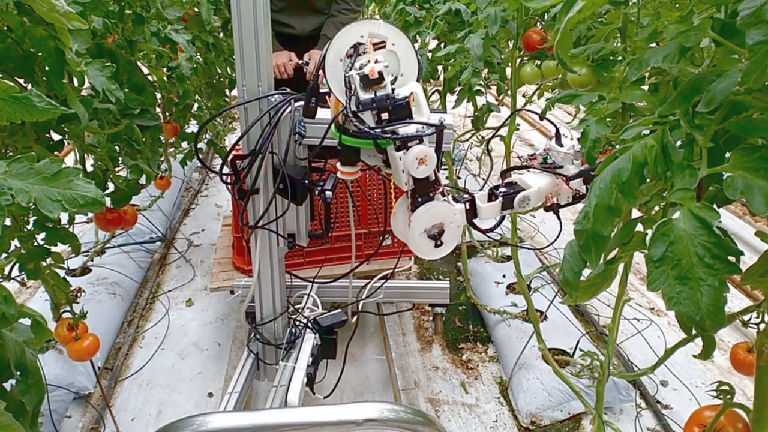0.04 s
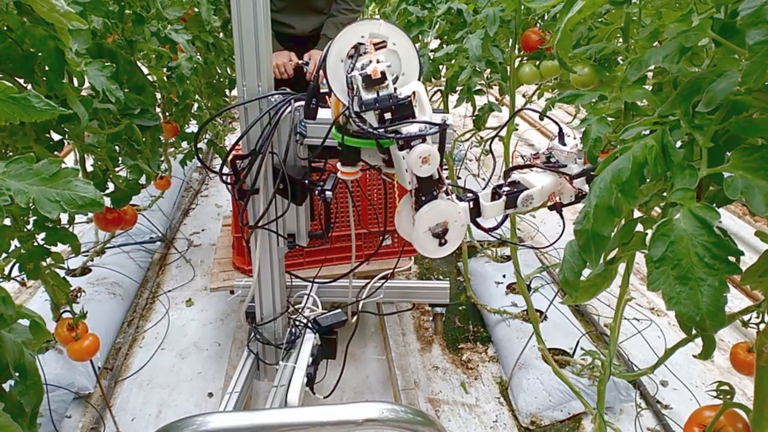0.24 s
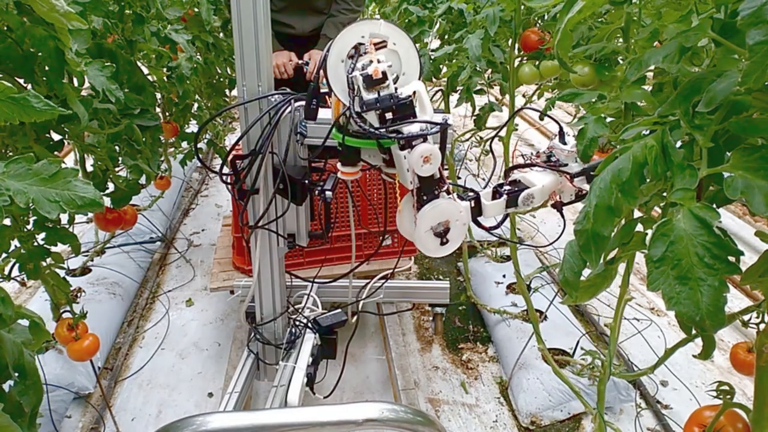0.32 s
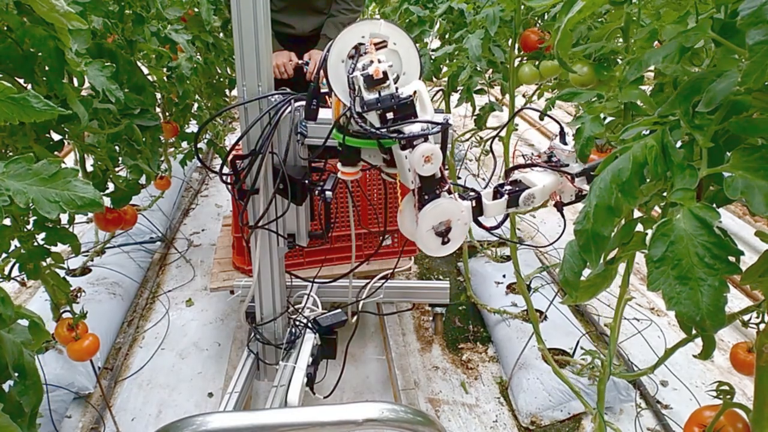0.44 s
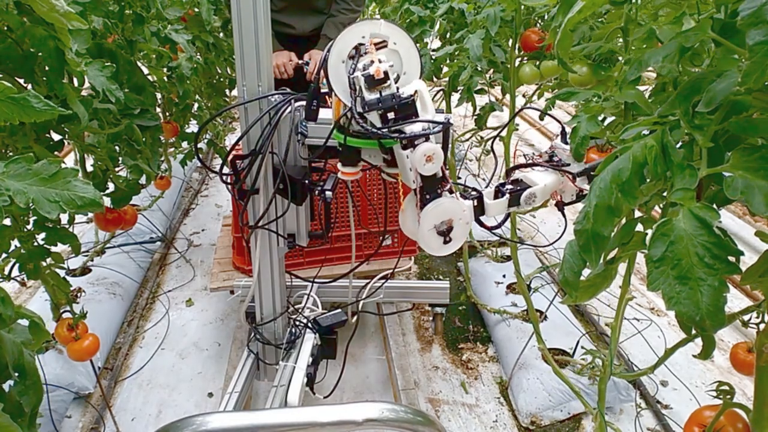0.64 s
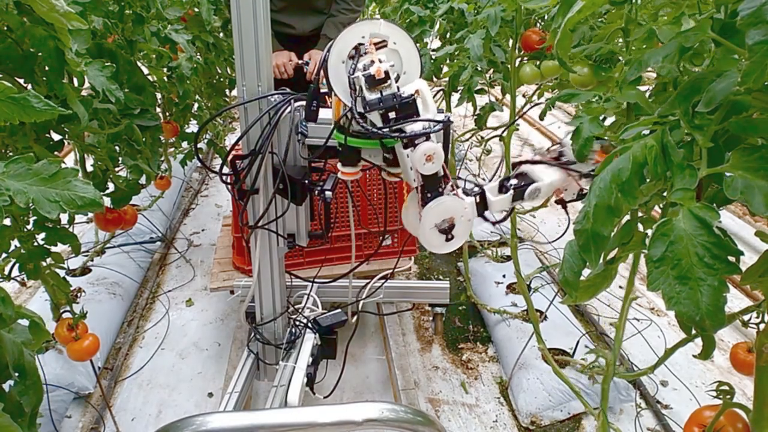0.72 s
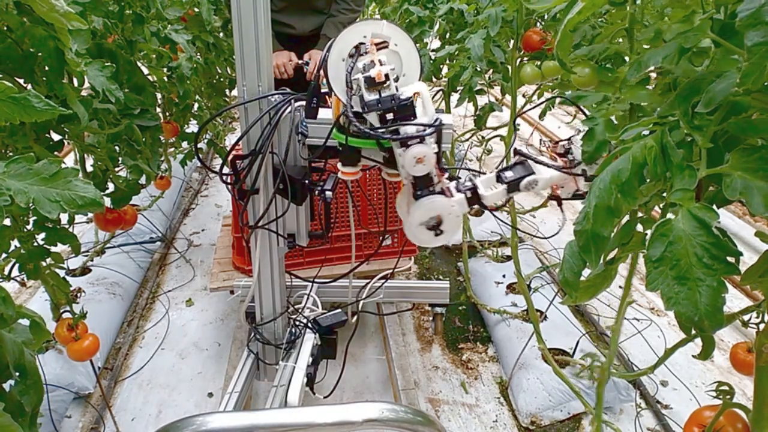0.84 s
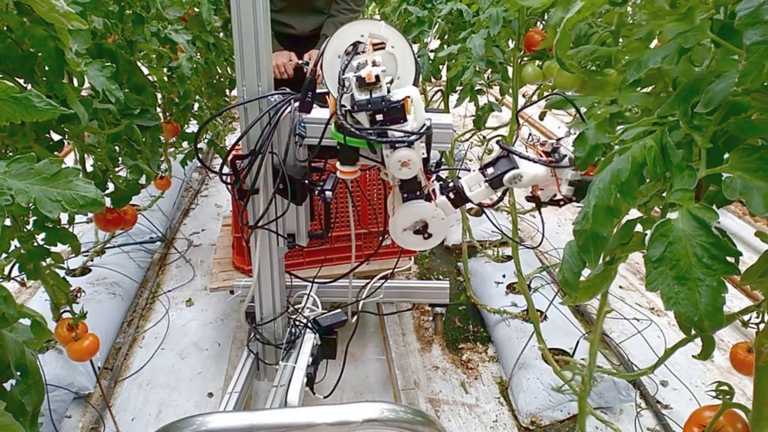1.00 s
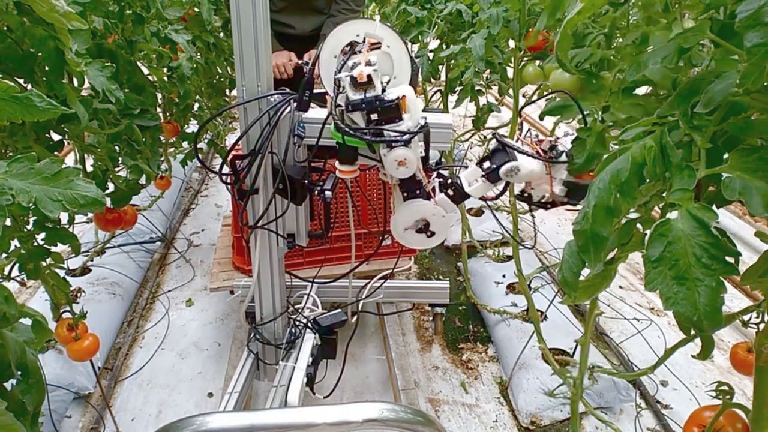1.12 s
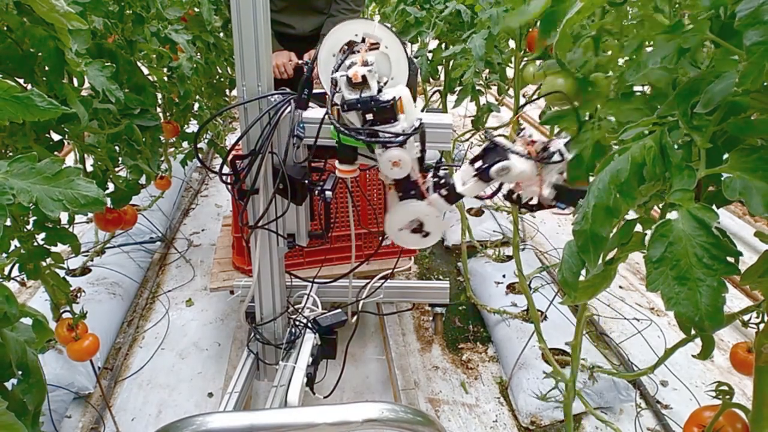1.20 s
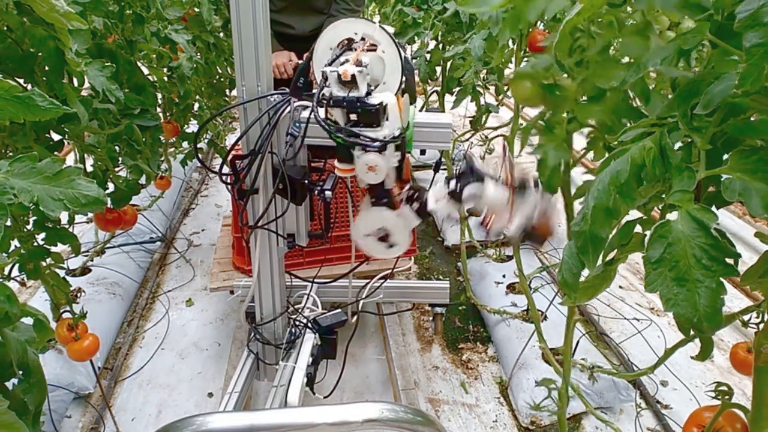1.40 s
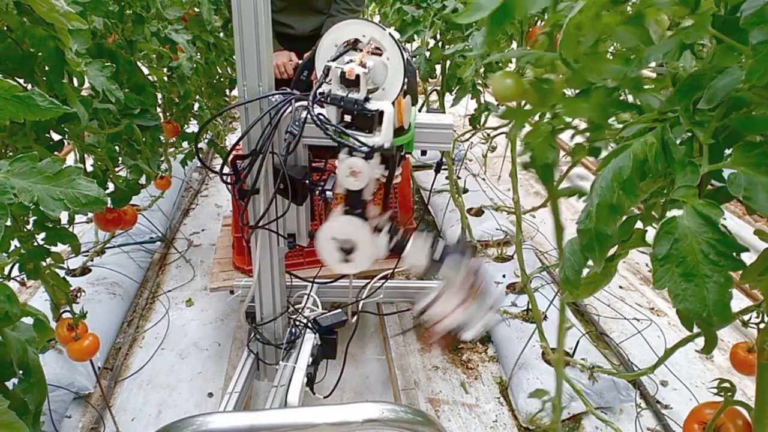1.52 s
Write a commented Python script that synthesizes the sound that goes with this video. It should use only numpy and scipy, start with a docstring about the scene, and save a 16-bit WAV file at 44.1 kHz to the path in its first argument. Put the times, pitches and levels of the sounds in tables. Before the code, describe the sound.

A bright, whistling burst of air hisses from a robot gripper. Then the arm moves with a thin motor whine, rasping gears and a few light ringing clicks, over a low machinery drone in a greenhouse.

```python
"""A greenhouse, where a robot arm works over the drone of machinery.
Its gripper lets out a bright burst of air: a turbulent jet with gliding whistles in it.
Then the arm swings away. The joint motors whine as gear-mesh harmonics sweep through the
resonances of the housing, the gear teeth rasp, and the linkage gives a few ringing clicks."""
import sys
import numpy as np
from scipy import signal
from scipy.fft import rfft, irfft, next_fast_len
from scipy.io import wavfile
from scipy.ndimage import uniform_filter1d, map_coordinates

SR = 44100
rng = np.random.default_rng(int(sys.argv[2]) if len(sys.argv) > 2 else 0)


def unload_audio(sound):
    """Save the sound as a 16-bit wav file, at the path given as the first command line argument."""
    columns = np.transpose(np.atleast_2d(sound))
    # keep every value between -1 and 1, then stretch to whole-number steps
    steps = np.round(np.clip(columns, -1, 1) * 32767)
    wavfile.write(sys.argv[1], SR, steps.astype(np.int16))


N = 68355

# Levels are relative; a pan is the level of the left channel over the right.
# spectra of the background drone and hiss, and the hum lines (f/Hz, level/dB)
DRONE_SPECTRUM = [(20,-36),(40,-18),(55,-4),(75,3),(146,0.5),(184,-2),(249,-3.5),(375,-21.5),(450,-32),(700,-60)]
HISS_SPECTRUM = [(200,-33),(350,-12.5),(520,-14),(800,-22),(1300,-17.5),(2400,-8.5),(4100,-18),(5200,-9.5),(6200,-10.5),(8700,-2),(10500,-13.5),(14500,-40)]
HUM_LINES = [(107.7,-80),(145.3,-64.5)]
# linkage clicks (t/s, level/dB, clatter T60/s, pan/dB, knock level/dB)
CLICKS = [(.152,-52.5,.04,0,-40),(.595,-46,.07,2,-30),(.738,-41,.06,0,-30),(1.269,-34,.05,-1,-42),(1.383,-30,.07,1,-24),(1.482,-38,.04,3,-40),(1.548,-33,.04,4,-40)]
# spectrum of a click's noise (f/Hz, level/dB)
CLICK_SPECTRUM = [(300,-44),(1000,-23),(1600,-3),(2500,-13),(5000,-34),(7500,11.5),(8800,12),(10000,-11),(11200,3.5),(14500,-27)]
# modes of the link (f/Hz, level/dB, T60/s)
LINK_MODES = [(1650,-19,.06),(4750,-17,.05),(7600,-7,.08),(8850,-6,.08),(13200,-17,.04)]
# envelopes of the gripper's air flow and of the low rush (t/s, level/dB)
JET_ENVELOPE = [(.177,-79),(.183,-49),(.194,-38.5),(.202,-30),(.222,-24.5),(.275,-22.5),(.31,-24.5),(.36,-23.5),(.395,-23),(.43,-22),(.468,-29),(.484,-34.5),(.502,-35.5),(.52,-43),(.56,-47)]
RUSH_ENVELOPE = [(.41,-68),(.445,-59),(.55,-60),(.66,-69.5),(.75,-62),(.9,-67),(1.05,-84),(1.3,-85),(1.4,-69),(1.46,-63.5),(1.5,-83),(1.55,-74)]
# their spectra (f/Hz, level/dB)
JET_SPECTRUM = [(900,-100),(1500,-47),(2400,-43),(3150,-27),(3500,-27),(3900,-39),(4250,-45),(4550,-24),(4850,-17),(5250,-21),(5600,-14.5),(6500,-7.5),(7500,3),(8300,2),(9200,4.5),(10300,-6.5),(12000,-13.5),(14000,-17),(14600,-41)]
RUSH_SPECTRUM = [(200,-21),(420,-3.5),(750,1.5),(1000,-4.5),(1300,-12.5),(2000,-22),(5000,-47)]
# whistles in the jet, one curve each (t/s, f/Hz, level/dB)
WHISTLES = [
    [(.235,7250,-42),(.265,7680,-27),(.293,7790,-24),(.32,7450,-27),(.35,7050,-30),(.37,6750,-36),(.39,6450,-30),(.41,6300,-45)],
    [(.355,9250,-36),(.378,9050,-23),(.392,8750,-25),(.402,8250,-25),(.415,7900,-38)],
    [(.39,8000,-36),(.402,7900,-28),(.415,7500,-29),(.455,7020,-34),(.485,7250,-42)],
    [(.345,10550,-38),(.378,10300,-31),(.392,9950,-32),(.405,9400,-40)],
    [(.415,10050,-38),(.44,9420,-28),(.46,9180,-23),(.474,9320,-28),(.487,9400,-48)],
    [(.26,10100,-38),(.28,10050,-34),(.296,9520,-26),(.325,9380,-35)],
]
# each whistle's position (pan/dB) and subharmonic (level/dB)
WHISTLE_PANS = [-4.5, 15, -7, 10, 16, 18]
SUBHARMONICS = [-24, -38, -30, -30, -19, -38]
# joint scrapes, Gaussian in time and pitch (t/s, sigma/s, level/dB, f/Hz, sigma/octaves)
SCRAPES = [(0.369,0.026,-69,820,0.11),(0.67,0.01,-48.5,2400,0.41),(0.735,0.0047,-48,3150,0.89),(0.806,0.027,-54.5,1940,0.16),(0.82,0.025,-50,5700,0.06)]
# envelopes of the tooth rasp and the gearbox grind (t/s, level/dB)
RASP_ENVELOPE = [(0.5, -56), (0.526, -47), (0.59, -46.5), (0.598, -39), (0.618, -47.5), (0.728, -39.5),
                 (1.152, -41), (1.25, -44.5), (1.274, -37.5), (1.288, -42), (1.376, -43), (1.382, -40.5),
                 (1.424, -40.5), (1.488, -41.5), (1.52, -43.5), (1.55, -41)]
GRIND_ENVELOPE = [(0.5, -94), (0.516, -61), (0.64, -59), (0.668, -46), (0.692, -54.5), (0.818, -48),
                  (0.934, -56.5), (1.0, -50.5), (1.18, -52.5), (1.438, -50.5), (1.51, -55), (1.55, -47.5)]
# their spectra (f/Hz, level/dB)
RASP_SPECTRUM = [(1000,-28.5),(3700,-16),(4500,-9),(5600,-4),(6900,0),(7700,1),(9000,2),(10100,-5.5),(12000,-17),(13500,-29),(14500,-35)]
GRIND_SPECTRUM = [(400,-54),(700,-7),(1100,-5),(1600,-5.5),(2200,-1.5),(3000,4),(3350,2),(3700,-7.5),(4300,-3.5),(7000,-11)]
# stereo balance of the jet and the rasp (f/Hz, pan/dB)
JET_PAN = [(3000,2),(5700,-1),(6900,-1),(7700,-7),(8400,9.5),(9500,5.5),(10500,9),(12200,3),(14800,3)]
RASP_PAN = [(60, -6), (150, 1), (380, -24), (940, -23), (2360, 5), (5910, -5), (14800, 15)]
# gear mesh of the main motor and whine of the wrist motor (t/s, f/Hz, level/dB)
GEAR_MESH = [(.74,1750,-70),(.81,1925,-52),(.86,1850,-62),(.905,1910,-64),(.975,1745,-64),(1.01,1855,-62),(1.13,1790,-61),(1.2,1715,-61),(1.3,1635,-58),(1.36,1597,-53),(1.395,1585,-48),(1.43,1568,-46.5),(1.47,1615,-51),(1.5,1660,-53),(1.55,1665,-53)]
WRIST_WHINE = [(.82,7700,-43),(.9,8080,-52),(.95,7840,-68),(1.01,7870,-48),(1.11,7750,-45),(1.16,7740,-41.5),(1.19,7370,-64)]
# resonances of the motor housing (f/Hz, level/dB)
HOUSING_RESPONSE = [(1500,-11),(1700,-11),(1930,-1),(2600,-6),(3150,4),(3350,-1),(3700,-12),(4750,-7),(5300,-17),(5750,-4),(6400,-6),(7200,-13),(8000,-4),(9100,-7),(10000,-15),(14000,-28)]
# envelopes of the gear squeal and the housing rattle (t/s, level/dB)
SQUEAL_ENVELOPE = [(.83,-54),(.885,-49),(.92,-44),(.985,-42.5),(1.02,-51),(1.09,-47.5),(1.2,-48),(1.23,-57)]
RATTLE_ENVELOPE = [(1.2,-64),(1.27,-51),(1.3,-50.5),(1.325,-58),(1.36,-56),(1.45,-62),(1.5,-64)]
# likeness of left and right in the noises (f/Hz, coherence/1)
COHERENCE = [(60,.99),(150,0.98),(300,0.9),(600,0.47),(2000,0.26),(8000,0.49),(14000,0.63)]
# lead of the left channel in the robot's sound (f/Hz, phase/rad)
PHASE_LEAD = [(100,-2.4),(1500,0.77),(3000,-1.77),(6000,-1.81),(9000,-1.53),(14000,-1.8)]


def amp(db):
    """Amplitude ratio of a level in decibels."""
    return 10 ** (np.asarray(db) / 20)


def unit(x):
    """Normalisation to unit rms."""
    return x / np.sqrt(np.mean(x ** 2) + 1e-20)


def along(points, hz):
    """Interpolation on a logarithmic frequency axis."""
    f, values = np.transpose(points)
    return np.interp(np.log(hz + 1), np.log(f + 1), values)


def clock():
    """Uniform sampling times in seconds."""
    return np.arange(N) / SR


def glide(rows):
    """Instantaneous frequency, linear between the points of a curve."""
    rows = np.array(rows)
    return np.interp(clock(), rows[:, 0], rows[:, 1])


def envelope(rows, fade_db_per_s=900):
    """Amplitude from a curve's last column, with exponential decay beyond its ends."""
    rows, t = np.array(rows), clock()
    outside = np.abs(t - np.clip(t, rows[0, 0], rows[-1, 0]))
    return amp(np.interp(t, rows[:, 0], rows[:, -1]) - fade_db_per_s * outside)


def wobble(rate):
    """Random modulation: a spline through `rate` Gaussian values a second."""
    return map_coordinates(rng.standard_normal(int(N * rate / SR) + 4), [clock() * rate])


def filtered(x, response):
    """Linear filtering: the spectrum is multiplied by a frequency response."""
    size = next_fast_len(N + 8192)
    return irfft(rfft(x, size) * response(np.fft.rfftfreq(size, 1 / SR)), size)[..., :N]


def pan(db):
    """Constant-power gains for a level difference between left and right."""
    gains = amp(np.array([[.5], [-.5]]) * db)
    return gains / np.sqrt(np.mean(gains ** 2, axis=0))


def bell(offset, sigma):
    """Gaussian window of unit height."""
    return np.exp(-.5 * (offset / sigma) ** 2)


def noise(spectrum):
    """Partially coherent stereo noise of unit rms, nearly mono in the bass."""
    def response(hz):
        angle = np.arccos(np.clip(along(COHERENCE, hz), -1, 1)) / 2
        return amp(along(spectrum, hz)) * [np.cos(angle), np.sin(angle)]
    mid, side = filtered(rng.standard_normal((2, N)), response)
    return unit(np.array([mid + side, mid - side]))


def running_phase(hz, jitter, rate):
    """Phase as the time integral of a slightly unsteady frequency."""
    return 2 * np.pi * np.cumsum(hz * (1 + jitter * wobble(rate))) / SR


def machinery():
    """Line and continuous spectra add: two wavering hums, a low drone and a faint hiss."""
    hum = 0
    for hz, db in HUM_LINES:
        phase = running_phase(hz, jitter=.016, rate=13.8)
        hum += amp(db) * unit(np.sin(phase) * amp(1.1 * wobble(9.3)))
    return hum + amp(-57) * noise(DRONE_SPECTRUM) + amp(-56.5) * noise(HISS_SPECTRUM)


def linkage_clicks(snap_t60=.005, knock_hz=560, knock_t60=.1):
    """Impact excitation: a snap and clatter, the damped modes of the link and a dull knock of the arm."""
    out = np.zeros((2, N))
    for start, db, t60, pan_db, knock_db in CLICKS:
        age = np.abs(clock() - start)
        ring = sum(amp(mode_db + rng.normal(0, 2.5) - 60 * age / decay) * np.sin(2 * np.pi * hz * age)
                   for hz, mode_db, decay in LINK_MODES)
        knock = amp(knock_db - 60 * age / knock_t60) * np.sin(2 * np.pi * knock_hz * age)
        snap = amp(1 - 60 * age / snap_t60)
        clatter = noise(CLICK_SPECTRUM) * (amp(-60 * age / t60) + snap)
        out += (clatter + ring + knock) * pan(pan_db) * (clock() >= start) * amp(db)
    return out


def air_jet(patch_db=3.2, patch_bins=2, patch_frames=9):
    """Turbulence radiates a hiss whose narrow bands swell and sink for hundredths of a second."""
    spectra = signal.stft(noise(JET_SPECTRUM), nperseg=512)[2]
    patches = uniform_filter1d(rng.standard_normal(spectra.shape[1:]), patch_bins, axis=0)
    patches = uniform_filter1d(patches, patch_frames, axis=1)
    hiss = signal.istft(spectra * amp(patch_db * unit(patches)), nperseg=512)[1][:, :N]
    hiss = filtered(unit(hiss), lambda hz: pan(along(JET_PAN, hz)))
    return hiss * envelope(JET_ENVELOPE) * amp(1.4 + .5 * wobble(163.8))


def whistles():
    """Flow tones glide in the jet, each with a weak subharmonic an octave below."""
    out = np.zeros((2, N))
    for curve, pan_db, sub_db in zip(WHISTLES, WHISTLE_PANS, SUBHARMONICS):
        phase = running_phase(glide(curve), jitter=.006, rate=1000)
        subharmonic = amp(sub_db) * np.sin(phase / 2 + wobble(460))
        tone = unit((np.sin(phase) + subharmonic) * amp(2.5 * wobble(160)))
        out += pan(pan_db) * tone * envelope(curve)
    return out * amp(2)


def low_rush():
    """Amplitude-modulated noise: a faint rush from the end of the burst onward."""
    return noise(RUSH_SPECTRUM) * envelope(RUSH_ENVELOPE) * amp(-1.5 + 1.8 * wobble(89.5))


def joint_scrapes():
    """Friction gives short swells of band-limited noise as the joints take up load."""
    out = np.zeros((2, N))
    for peak_s, sigma_s, db, hz, octaves in SCRAPES:
        band = filtered(noise(GRIND_SPECTRUM), lambda f: bell(np.log2((f + 1) / hz), octaves))
        out += unit(band) * amp(db) * bell(clock() - peak_s, sigma_s)
    return out


def gears():
    """Contact noise: the teeth rasp over a lower grind, both under one grainy modulation."""
    rasp = filtered(noise(RASP_SPECTRUM), lambda hz: pan(along(RASP_PAN, hz)))
    grain = amp(1.5 * wobble(600))
    grind = unit(noise(GRIND_SPECTRUM) * grain) * envelope(GRIND_ENVELOPE)
    return unit(rasp * grain) * envelope(RASP_ENVELOPE) * amp(-1) + grind


def main_motor(teeth=11, runout_rad=.52, rattle_hz=3150, rattle_sigma_hz=160):
    """Forced vibration: mesh harmonics sweep the housing's resonances and rattle it; the fifth squeals."""
    mesh_hz = glide(GEAR_MESH)
    phase = running_phase(mesh_hz, jitter=.002, rate=250)
    gear_angle = phase / teeth
    sway = runout_rad * np.sin(gear_angle + .5 * wobble(40))  # the mesh phase swings once a turn
    whine = 0
    for k in range(1, 8):
        gain = amp(along(HOUSING_RESPONSE, k * mesh_hz) + 1.5 * wobble(100))
        whine += gain * np.sin(k * phase + sway)
    ringing = filtered(noise(GRIND_SPECTRUM), lambda hz: bell(hz - rattle_hz, rattle_sigma_hz))
    rattle = unit(ringing * (1 + .5 * np.sin(gear_angle))) * envelope(RATTLE_ENVELOPE)
    fifth = np.sin(5 * phase + sway + .8 * wobble(260))
    squeal = unit(fifth * amp(2 * wobble(120))) * envelope(SQUEAL_ENVELOPE)
    return whine * envelope(GEAR_MESH) * amp(1.5) + rattle + pan(9) * squeal


def wrist_motor():
    """Random frequency and amplitude modulation broaden one partial into a thin whine."""
    phase = running_phase(glide(WRIST_WHINE), jitter=.021, rate=400)
    whine = unit(np.sin(phase) * amp(1.9 * wobble(91.5)))
    return pan(-4.2) * whine * envelope(WRIST_WHINE)


def greenhouse(x, t60=.16, onset_s=.0012):
    """Diffuse reverberation among the plants: convolution with exponentially decaying noise."""
    t = np.arange(SR // 2) / SR
    tail = rng.standard_normal((2, len(t))) * amp(-60 * t / t60) * (1 - np.exp(-t / onset_s))
    return signal.fftconvolve(x, tail / np.linalg.norm(tail[0]), axes=1)[:, :N]


def scene():
    """Superposition of the robot's direct sound, its reverberation and the machinery."""
    air = air_jet() + whistles() + low_rush()
    arm = main_motor() + wrist_motor() + gears() + joint_scrapes() + linkage_clicks()
    robot = filtered(air + arm, lambda hz: np.exp(np.array([[.5j], [-.5j]]) * along(PHASE_LEAD, hz)))
    return robot + amp(-10) * greenhouse(robot) + machinery()


def record(dry, cutoff_hz=14450):
    """Band limiting by an ideal low-pass filter."""
    return filtered(dry, lambda hz: hz < cutoff_hz)


dry = scene()
out = record(dry)
unload_audio(out)
```